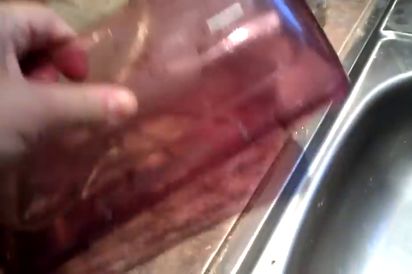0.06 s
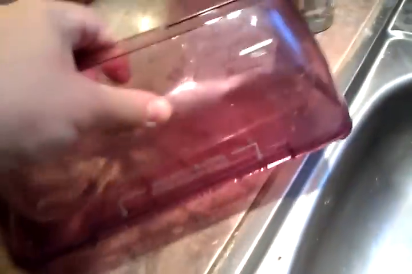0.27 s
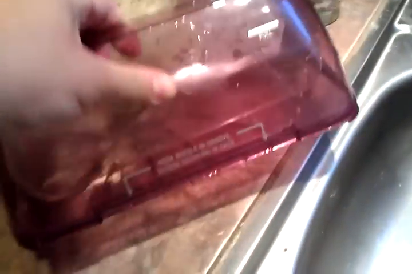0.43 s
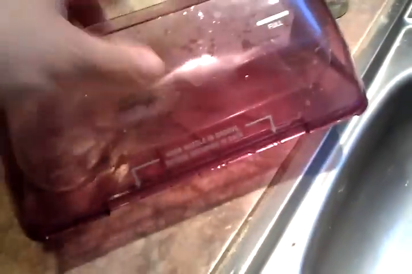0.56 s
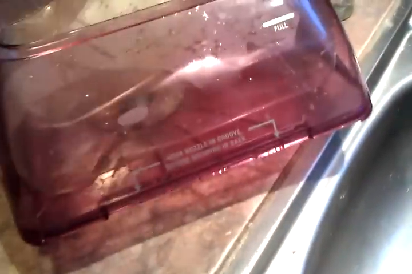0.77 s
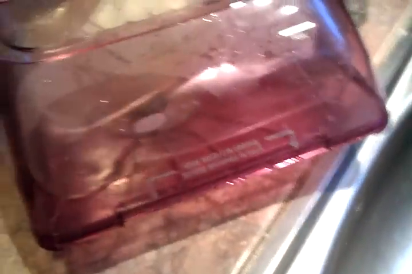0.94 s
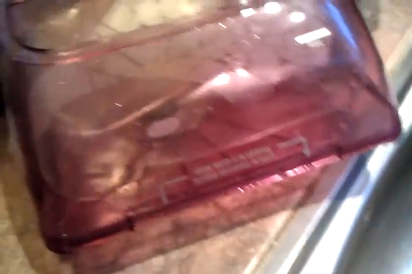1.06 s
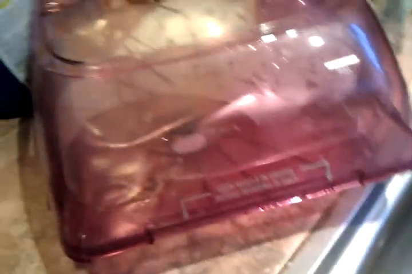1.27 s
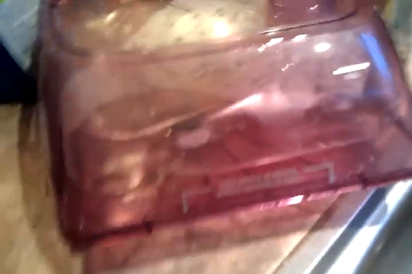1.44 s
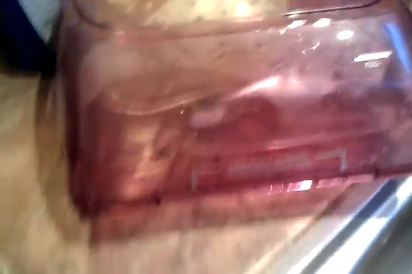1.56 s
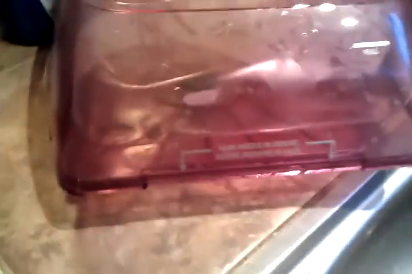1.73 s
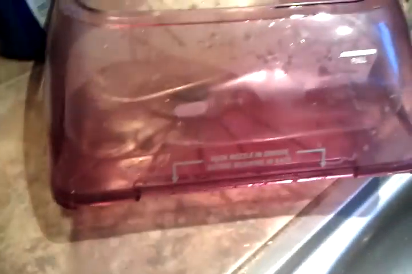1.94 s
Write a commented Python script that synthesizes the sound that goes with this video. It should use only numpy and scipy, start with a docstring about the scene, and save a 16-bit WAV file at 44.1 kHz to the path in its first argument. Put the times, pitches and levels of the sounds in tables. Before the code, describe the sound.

An empty hard plastic tank taps lightly and slides on a kitchen counter, then lands with a loud clattering knock at about 0.25 seconds, slightly overloading the dull microphone. It rocks with smaller knocks and settles by 0.6 seconds. Fingers rub faintly on plastic, with a few close clicks from 1.3 to 1.7 seconds, clearest around 1.5. A faint appliance hum and room noise continue throughout.

```python
"""Over a faint appliance hum, an empty hard plastic tank taps lightly on a kitchen counter. It slides by
stick-slip friction, lands with a loud clattering knock, rocks onto its other edge and settles; each
impact excites the damped modes of its walls, and the small room reverberates. Later, fingers rub and
click on plastic close to the microphone, which is dull and overloads on the loud knock."""
import sys
import numpy as np
from scipy import signal
from scipy.fft import rfft, irfft
from scipy.io import wavfile
from scipy.ndimage import uniform_filter1d

SR = 44100
rng = np.random.default_rng(int(sys.argv[2]) if len(sys.argv) > 2 else 0)


def dump(signal):
    """Clip the signal to [-1, 1] and save it as 16-bit WAV at the path in sys.argv[1]."""
    limited = np.clip(np.atleast_2d(signal).T, -1, 1)
    pcm = np.round(limited * 32767).astype(np.int16)
    wavfile.write(sys.argv[1], SR, pcm)


N = 88200
T = np.arange(N) / SR

# Spectrum of the room air. Each row: frequency in Hz, relative spectral density in dB.
AIR_SPECTRUM = [(18, -61.5), (30, -32.5), (107, -6), (177, -9), (304, -1.5), (472, -11.5), (606, -11),
                (795, -17), (1870, -17), (2030, -20), (2210, -19.5), (3570, -31.5), (4400, -46.5),
                (5720, -73.5), (9680, -120)]
# Tones of the appliance. Each row: frequency in Hz, level in dB.
HUM_TONES = [(295, -56.5), (404, -71)]
# Taps of the rim. Each row: start in seconds, level in dB, pitch in Hz, tick level in dB.
RIM_TAPS = [(0.0659, -27.5, 1292, -38.5), (0.1321, -43, 1308, -59.5), (0.1524, -27.5, 856.7, -54.5)]
# Resonances common to all taps. Each row: frequency in Hz, bandwidth in Hz, relative level in dB.
RIM_RESONANCES = [(1220, 900, -2), (1814, 150, -2)]
# Resonances driven by the slide. Each row: frequency in Hz, bandwidth in Hz, relative level in dB.
SLIDE_RESONANCES = [(97, 110, -48), (191, 27, -38.5), (327.6, 130, -41.5), (926, 800, -42),
                    (1850, 200, -45)]
# Envelope of the slide. Each row: time in seconds, gain in dB.
SLIDE_ENVELOPE = [(0, -14.5), (0.15, -19), (0.17, 1), (0.235, -5), (0.27, -57.5)]
# Impacts of tank on counter. Each row: start in seconds, factor on the ring time (small while the hand
# damps the walls), then the drive in dB of the counter's thud, the bass, the middle and the treble.
IMPACTS = [(0.2368, 0.53, -29.5, -20, -13, -19), (0.2423, 0.42, -14.5, -9, -2.5, -6.5),
           (0.246, 0.35, -2.5, 2.5, 0, -3), (0.2548, 0.46, -8, -7, -4.5, -7),
           (0.277, .6, -16.5, -26.5, -23, -29), (0.296, 0.592, -16.5, -28, -17, -21),
           (0.3779, 0.88, -20.5, -7.5, -16.5, -16.5), (0.4031, 0.73, -32, -13.5, -19, -38),
           (0.4748, 0.767, -28, -24, -29, -42)]
# Edges of those zones in Hz: top of the thud, both ends of the bass and middle, foot of the treble.
ZONE_EDGES_HZ = [170, 240, 450, 570, 1900, 2700]
# Main modes of the walls. Each row: frequency in Hz, relative level in dB, unscaled T60 in seconds.
WALL_MODES = [(164.42, -19.5, 0.44), (211.4, -7.5, 0.16), (266, -4.5, .25), (372.3, -7, 0.23),
              (442, 1, 0.11), (554.4, -2.5, 0.15), (638.5, -6.5, 0.16), (842.4, -14, 0.37),
              (932, -6.5, 0.22), (1093.4, -5.5, 0.17), (1446, -5.5, .15), (1485, -9, 0.14),
              (1908, -7, 0.14), (2002, -11.5, 0.26)]
# Spectrum of the short-lived modes. Each row: frequency in Hz, relative level in dB per half octave.
CRACK_SPECTRUM = [(40, -27), (100, -16), (250, -13.5), (600, -10.5), (1300, -7), (1900, -8), (2600, -11.5),
                  (3600, -6.5), (4500, -8.5)]
# Envelope of the fingers' rubbing. Each row: time in seconds, level in dB.
RUB_ENVELOPE = [(0.58, -69), (0.66, -62), (0.75, -74.5), (1.25, -68.5), (1.33, -61.5), (1.41, -67),
                (1.49, -55.5), (1.508, -43), (1.535, -47), (1.565, -60), (1.63, -64.5), (1.76, -72.5)]
# Clicks of the fingers. Each row: start in seconds, then the tick, body and thump levels in dB.
FINGER_CLICKS = [(1.3325, -40, -38.5, -69), (1.377, -60, -39, -65), (1.5132, -24.5, -49.5, -45),
                 (1.5403, -16.5, -34.5, -52), (1.552, -27.5, -37.5, -62), (1.5535, -52, -55, -24),
                 (1.5853, -54, -36.5, -26.5), (1.728, -40.5, -45, -67)]

CONTACT_S = 0.00092  # time constant of the attack of a tap or crack


def undb(db):
    """Amplitude ratio for a level in decibels."""
    return 10 ** (np.asarray(db) / 20)


def unit(x):
    """The signal normalised to rms 1."""
    return x / np.sqrt(np.mean(x ** 2))


def colour(hz, points):
    """Gain at hz, interpolated in log frequency between (Hz, dB) points."""
    freqs, db = np.array(points).T
    return undb(np.interp(np.log(hz), np.log(freqs), db))


def band(x, hz, width, order=2):
    """Response of a band-pass resonator around hz, normalised to rms 1."""
    low = np.hypot(hz, width / 2) - width / 2
    return unit(signal.sosfilt(signal.butter(order, [low, low + width], "band", fs=SR, output="sos"), x))


def rise(seconds):
    """Exponential approach to 1 with the given time constant."""
    return 1 - np.exp(-T / seconds)


def fade(t60):
    """Exponential decay of 60 dB in t60 seconds."""
    return np.exp(-np.log(1000) * T / t60)


def burst(hz, width, env):
    """Steady band noise shaped by an envelope and given that envelope's energy."""
    x = band(rng.standard_normal(2 * N), hz, width)[N:] * env
    return x * np.sqrt(np.sum(env ** 2) / np.sum(x ** 2))


def at(start, x):
    """The signal delayed by start seconds."""
    return np.concatenate([np.zeros(int(start * SR)), x])[:N]


def wander(per_s):
    """Smooth fluctuation through per_s Gaussian values a second."""
    step = int(SR / per_s)
    return uniform_filter1d(np.repeat(rng.standard_normal(N // step + 1), step), step)[:N]


def room_air(level_db=-54):
    """Stationary noise: a white spectrum weighted towards the low frequencies."""
    hz = np.maximum(np.arange(N // 2 + 1) * SR / N, 1)
    spectrum = rfft(rng.standard_normal(N)) * colour(hz, AIR_SPECTRUM)
    return undb(level_db) * unit(irfft(spectrum, N))


def appliance_hum(waver_db=1.2, drift_hz=2.5):
    """Slow random modulation of amplitude and frequency makes two steady tones waver."""
    out = 0
    for hz, db in HUM_TONES:
        amplitude = np.sqrt(2) * undb(db + waver_db * wander(11))
        phase = 2 * np.pi * np.cumsum(hz + drift_hz * wander(3.5)) / SR
        out += amplitude * np.sin(phase)
    return out


def room_tail(hz, bass_t60=0.47, treble_t60=0.32):
    """Reverberation envelope: the diffuse field builds up, then decays, more slowly in the bass."""
    t60 = np.interp(np.log(hz), np.log([200, 4000]), [bass_t60, treble_t60])
    return rise(0.008) * fade(t60)


def rim_tap(db, pitch_hz, tick_db, room_hz=1040):
    """Impulse response of the stiff rim: short mid resonances, a faint tick and reverberation."""
    decay = fade(0.057)
    tail = undb(-14.5) * room_tail(room_hz)
    rim = burst(pitch_hz, 182, decay)
    rim += sum(undb(level) * burst(hz, width, decay) for hz, width, level in RIM_RESONANCES)
    room = burst(room_hz, 1500, tail)
    tick = burst(2500, 2200, decay + tail)
    return (undb(db) * (rim + room) + undb(tick_db) * tick) * rise(CONTACT_S)


def stick_slip(slips_per_s=2500):
    """Stick-slip friction: a dense random train of unequal impulses."""
    return (rng.random(N) < slips_per_s / SR) * rng.standard_normal(N)


def tank_slide():
    """Forced vibration: friction on the counter drives broad and narrow resonances."""
    friction = stick_slip()
    scrape = sum(undb(db) * band(friction, hz, width) for hz, width, db in SLIDE_RESONANCES)
    return undb(np.interp(T, *np.array(SLIDE_ENVELOPE).T)) * scrape


def impact_drive(hz, thud, bass, middle, treble):
    """Excitation at hz: the point of impact sets how strongly each zone is driven."""
    return colour(hz, list(zip(ZONE_EDGES_HZ, [thud, bass, bass, middle, middle, treble])))


def wall_ringing(gain_db=-4, pitch_wander=0.0086):
    """Damped modes sum the energy of successive impacts; their pitch wanders as the walls flex."""
    out, attack = 0, rise(0.0029)
    for hz, db, t60 in WALL_MODES:
        energy = sum(at(start, (impact_drive(hz, *drive_db) * attack * fade(t60 * ring_factor)) ** 2)
                     for start, ring_factor, *drive_db in IMPACTS)
        phase = 2 * np.pi * np.cumsum(hz * (1 + pitch_wander * wander(60))) / SR
        out += undb(db + gain_db) * np.sqrt(energy) * np.sin(phase)
    return out


def wall_crack(drive_db, t60=0.062, room_db=-18.5):
    """Modal overlap: the many short-lived modes of one impact merge into noise, and the room answers."""
    out = 0
    for hz in 40 * 2 ** np.arange(0, 7.5, .5):  # half-octave bands
        env = np.hypot(fade(t60), undb(room_db) * room_tail(hz))  # direct and room energies add
        gain = impact_drive(hz, *drive_db) * colour(hz, CRACK_SPECTRUM)
        out += gain * burst(hz, hz / np.sqrt(8), env)
    return out * rise(CONTACT_S)


def finger_rub(flicker_db=2.5, body_db=-2):
    """Friction of fingers on plastic drives a bright band and a broad body resonance."""
    level_db = np.interp(T, *np.array(RUB_ENVELOPE).T) + flicker_db * wander(120)
    friction = stick_slip()
    bright = band(friction, 3150, 1000)
    body = band(friction, 1700, 1600, order=1)
    return undb(level_db) * (bright + undb(body_db) * body)


def finger_click(tick_db, body_db, thump_db, tick_hz=3360, thump_hz=134):
    """Release transient: as fingers let go, the plastic gives a heavily damped tick, body and thump."""
    tail = undb(-33.5) * room_tail(tick_hz)
    tick_decay = fade(0.0065)
    tick = np.sin(2 * np.pi * tick_hz * T) * tick_decay + burst(tick_hz, 700, 0.43 * tick_decay + tail)
    body = burst(1305, 744, fade(0.013) + tail)
    thump = -np.sin(2 * np.pi * thump_hz * T) * fade(0.0083)
    return (undb(tick_db) * tick + undb(body_db) * body + undb(thump_db) * thump) * rise(0.00015)


def scene():
    """Superposition of tank, fingers and kitchen at the microphone, in one channel."""
    tank = tank_slide()
    tank += sum(at(start, rim_tap(*tap)) for start, *tap in RIM_TAPS)
    tank += wall_ringing()
    tank += sum(at(start, wall_crack(drive_db)) for start, _, *drive_db in IMPACTS)
    fingers = finger_rub()
    fingers += sum(at(start, finger_click(*levels)) for start, *levels in FINGER_CLICKS)
    return (tank + fingers + room_air() + appliance_hum())[None]


def record(dry, low_hz=62, mic_hz=3967, ceiling=0.71, knee=9, top_hz=16000):
    """Band limiting and saturation: a dull microphone, an amplifier that flattens peaks, a top cut."""
    dull = signal.sosfilt(signal.cheby1(10, .5, mic_hz, fs=SR, output="sos"), dry)
    dull = signal.sosfilt(signal.butter(2, low_hz, "high", fs=SR, output="sos"), dull)
    clipped = dull / (1 + np.abs(dull / ceiling) ** knee) ** (1 / knee)
    return signal.sosfilt(signal.ellip(8, .2, 70, top_hz, fs=SR, output="sos"), clipped)


dry = scene()
out = record(dry)
dump(out)
```